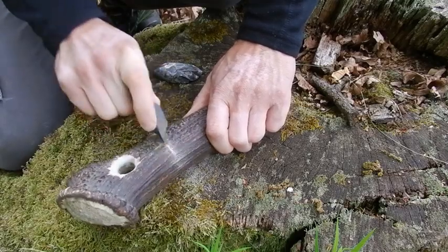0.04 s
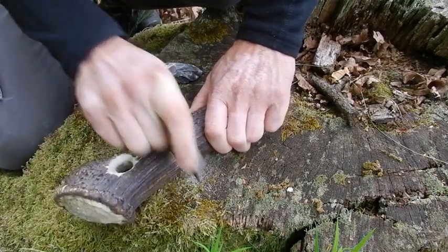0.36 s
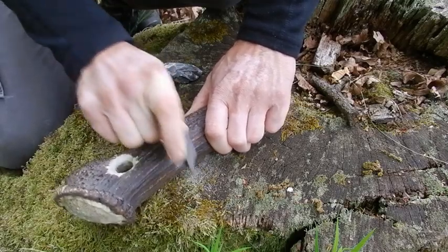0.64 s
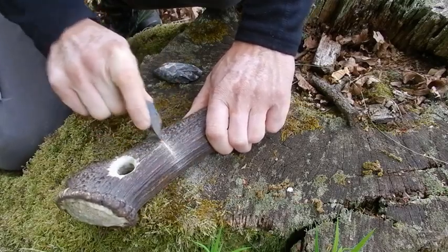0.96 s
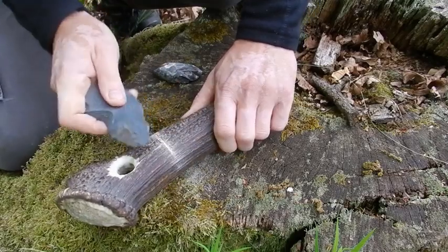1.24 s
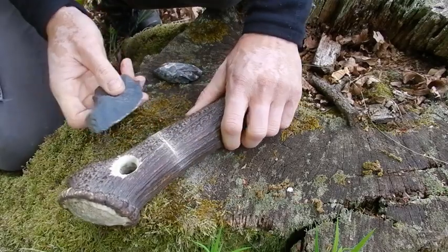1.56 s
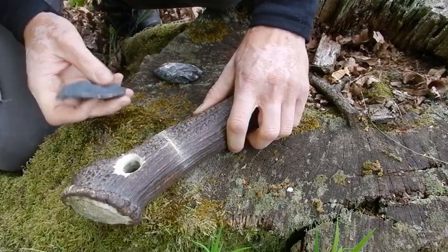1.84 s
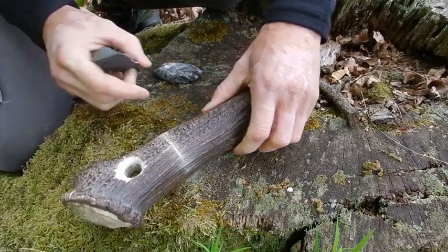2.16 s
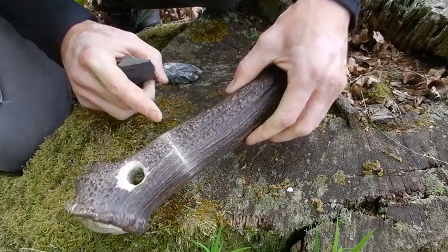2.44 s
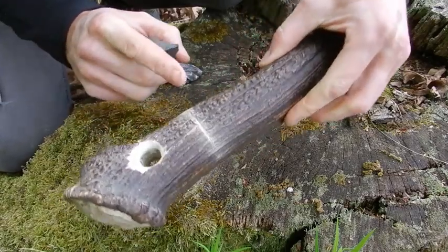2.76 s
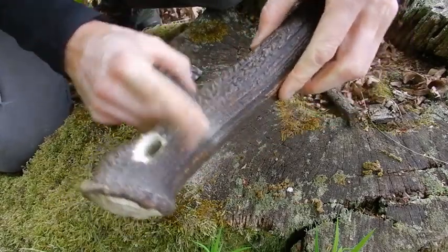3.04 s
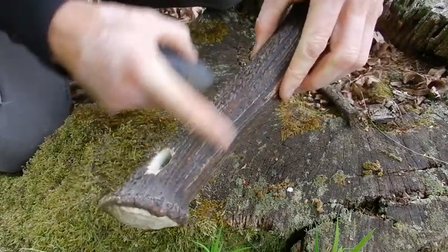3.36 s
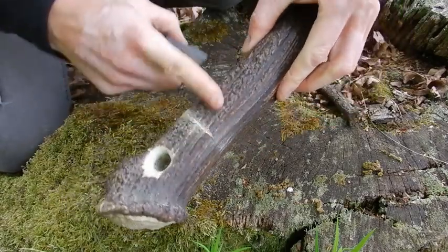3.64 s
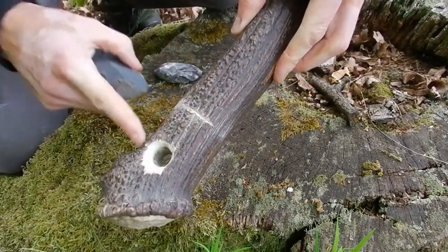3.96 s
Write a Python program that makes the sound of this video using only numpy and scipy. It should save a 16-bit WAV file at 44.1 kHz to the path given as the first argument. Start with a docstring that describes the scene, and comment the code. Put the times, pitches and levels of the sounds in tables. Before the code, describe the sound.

A stone flake saws at an antler in nine quick, rasping strokes during the first second, with gritty catches and tiny snaps. Then distant birds chirp faintly in quiet woods over a low rush and a faint wavering hum. From about 3.1 to 3.4 seconds, stone and antler knock lightly a few times. Soft finger wipes and dull hand bumps on a stump continue until about 4 seconds.

```python
"""A stone flake saws a groove in an antler held on a mossy stump, in nine strokes of stick-slip friction.
Tiny slips excite the antler's damped modes, the edge catches now and then, dust is crushed and chips snap.
As the antler is turned, stone and antler knock lightly, a finger wipes off the dust and hands bump
the stump. Distant birds reverberate in quiet woods, over a faint steady rush and a wavering hum."""
import sys
import numpy as np
from scipy import signal
from scipy.fft import rfft, irfft
from scipy.io import wavfile
from scipy.ndimage import uniform_filter1d

SR = 44100
rng = np.random.default_rng(int(sys.argv[2]) if len(sys.argv) > 2 else 0)


def master(y):
    """Save y as 16-bit WAV."""
    cut = np.clip(np.atleast_2d(y).T, -1, 1)
    pcm = np.round(cut * 32767)  # scale
    wavfile.write(sys.argv[1], SR, pcm.astype(np.int16))


N = 176400
T = np.arange(N) / SR

# Levels in the tables are relative; T60 is the time of a 60 dB decay.
# saw strokes (start [s], length [s], grinding [dB], grit [dB], growth over the stroke [dB],
# grit treble [dB], boom of the lowest mode [dB])
STROKES = [(0.024, 0.068, -30.5, -47.5, -10.5, -29, -29), (0.14, 0.082, -33.5, -47.5, -10, -3, -14),
           (0.278, 0.046, -30, -45, -14, -20, -8), (0.355, 0.092, -30.5, -48, 0, 2, -6.5),
           (0.478, 0.065, -28, -43.5, -0.5, -13, -7.5), (0.589, 0.072, -33, -46.5, 3.5, -2, -12),
           (0.7, 0.078, -25.5, -42, -2.5, -5, -1.5), (0.814, 0.078, -30.5, -45, -7, -10, 2),
           (.927, 0.098, -32, -46, -2.5, -31, 0)]
# the edge catches and lets go (time [s], level [dB], release time [ms])
CATCHES = [(0.0384, 3, 0.075), (0.052, -9.5, 0.094), (.069, -1.5, 0.089), (0.131, -14, .027),
           (0.1506, 1, 0.13), (.175, -9, .3), (0.203, -1.5, 0.75), (0.2925, -3, 0.31), (0.4278, -3.5, 0.89),
           (0.4826, -3.5, 0.3), (0.5158, 0, 0.16), (0.5275, 4.5, 0.086), (.628, -7.5, 0.6),
           (.645, -5, 0.29), (0.7206, 0.5, 0.19), (0.73, -2, 0.079), (0.735, 0, 0.58), (0.7512, 5, 0.061),
           (0.839, 2, 0.44), (.8894, 5.5, 0.056), (0.9303, -1, 0.13), (0.9378, -3, .2),
           (0.9627, -2.5, 0.09), (0.9879, 3, .1)]
# chips of antler and stone snap (time [s], level [dB])
CHIPS = [(0.13, -11.5), (0.141, -16), (0.406, -16), (0.659, -14), (0.765, -11), (0.776, -13), (0.801, -20),
         (1.282, -22), (1.467, -26.5), (3.456, -31.5)]
# modes of the antler pressed on the stump, and of the flake (frequency [Hz], level [dB], T60 [s])
HELD_MODES = [(389.4, -3.5, 0.14), (449, -1.5, 0.11), (542, -2, 0.093), (686, 2.5, 0.071), (792, 5, 0.054),
              (961, 9, 0.055), (975, 6, 0.039), (1200, -8, 0.05), (1350, -30, .04), (1524, 0, 0.1),
              (1650, -8, 0.033), (2160, 1, 0.019)]
FLAKE_MODES = [(3610, 11, 0.0034), (5680, 7, 0.0079), (9770, -12, 0.01)]
# modes of the lifted antler (frequency [Hz]) and, row for row, their (level [dB], T60 [s])
FREE_HZ = [872, 1319, 1580, 2030, 3180, 3820, 9750]
FREE_MODES = [(3.5, 0.033), (1, 0.059), (-0.5, 0.043), (-8, 0.014), (0, 0.047), (-3, 0.06), (-4, .025)]
# stone meets antler (time [s], level [dB], contact time [ms], ring [dB], crunch [dB], low cutoff [Hz],
# crunch T60 [s], frequency favoured by the spot struck [Hz], thud [dB])
KNOCKS = [(3.092, -3.5, 0.041, 10, -13.5, 1310, 0.013, 1810, -12),
          (3.1012, 1.5, 0.065, -4.5, -21, 1300, 0.079, 2100, -15.5),
          (3.1511, 0, 0.04, 9, -23, 780, 0.043, 1230, -16), (3.3386, 4, 0.25, 9, -10, 740, 0.12, 1530, -7)]
# finger wipes, and bumps of the hands on the stump (centre [s], half length [s], level [dB])
WIPES = [(3.088, 0.024, -41), (3.14, 0.0087, -49.5), (3.235, 0.047, -52.5), (3.33, 0.027, -48.5),
         (3.437, 0.042, -50), (3.545, 0.044, -52.5), (3.655, 0.029, -52), (3.755, 0.043, -56),
         (3.84, 0.028, -53.5)]
BUMPS = [(3.27, 0.018, -39), (3.45, 0.013, -38.5), (3.53, 0.036, -41.5), (3.96, 0.087, -38.5)]
# bird notes (start [s], length [s], first pitch [Hz], last pitch [Hz], level [dB], warble [fraction])
BIRD_NOTES = [(0.565, 0.043, 3493, 3417, -39.5, 0.0059), (0.938, 0.2, 3996, 3990, -48, 0.011),
              (1.044, 0.061, 2550, 2350, -48, 0.017), (1.198, 0.15, 3438, 3316, -44.5, 0.0092),
              (1.337, 0.046, 3140, 2834, -44, 0.016), (1.423, 0.15, 3393, 3310, -46.5, 0.022),
              (1.532, 0.14, 2414, 2710, -48, 0.019), (1.579, 0.15, 5750, 7260, -56, .1),
              (1.711, 0.104, 4120, 4190, -48.5, 0.0093), (1.758, 0.066, 3245, 2995, -43.5, 0.071),
              (1.852, 0.084, 3702, 3666, -44.5, 0.021), (1.964, 0.047, 2760, 3450, -44.5, 0.025),
              (2.025, .075, 3046, 3560, -50, .015), (1.84, .13, 7650, 7600, -62, 0.019),
              (2.042, 0.056, 9000, 8500, -53, 0.0217), (2.09, 0.087, 5840, 6850, -49.5, .055),
              (2.166, 0.08, 7830, 7620, -55, 0.022), (2.854, .035, 7740, 7440, -54.5, .012),
              (2.923, 0.16, 3030, 2950, -54.5, 0.065), (3.603, 0.044, 2910, 2856, -51, 0.0073),
              (3.688, 0.051, 2910, 2930, -57, .004), (3.726, 0.026, 4930, 4920, -51.5, .0026),
              (3.861, 0.083, 3084, 3098, -54.5, 0.012)]
# envelope of the distant hum (time [s], level [dB])
HUM_ENVELOPE = [(0, -70), (1.3, -74.5), (1.9, -58.5), (2.9, -51), (3.3, -65), (4, -56)]
# spectral envelopes of the noisy sounds (frequency [Hz], spectral density [dB])
GRIND_SPECTRUM = [(35, -47), (70, -6), (130, -0.5), (200, -12), (310, -18), (390, 10.5), (950, 1.5),
                  (1500, -1), (2200, -4), (3000, -30), (5000, -18.5), (16000, -87)]
CATCH_SPECTRUM = [(40, -63), (120, -63), (280, -45), (420, 5), (1000, 14.5), (2100, 8), (3200, -1.5),
                  (5000, -19), (16000, -45)]
GRIT_SPECTRUM = [(500, -2.5), (2000, 7), (3600, 2.5), (4600, 1.5), (5500, -.5), (6800, -3), (9800, -3.5),
                 (13500, -9), (16000, -22)]
KNOCK_SPECTRUM = [(60, -25), (250, -3), (450, -2), (950, 3), (1400, 18), (2200, 10.5), (4000, -4),
                  (7000, -30), (16000, -25)]
THUD_SPECTRUM = [(100, -13.5), (250, -28), (380, -0.5), (600, -13), (880, -9.5), (1200, -8), (2500, -22),
                 (16000, -40)]
CRUNCH_SPECTRUM = [(300, -33), (1000, -50), (3500, 10), (5200, 8.5), (7000, 0), (8600, 11.5), (9800, 19),
                   (11500, -6), (16000, -14)]
WIPE_SPECTRUM = [(300, -10), (1500, -3.5), (4000, -5.5), (6500, -4.5), (9000, -3.5), (13000, -1),
                 (16000, -7)]
AIR_SPECTRUM = [(20, -36), (42, -8), (62, 5), (85, 9.5), (118, -2.5), (150, -0.5), (200, -9), (290, -21.5),
                (400, 1), (560, -5.5), (800, -5), (1400, -7.5), (2000, -15.5), (2700, -24.5), (4500, -24.5),
                (8000, -27), (13000, -27.5), (16000, -35)]

SLIPS_PER_S, GRIT_PER_S, WIPE_GRAINS_PER_S = 1400, 2200, 4000
STROKE_RISE_S, STROKE_FALL_S, STROKE_SAG_DB, OVERHANG_S = 0.025, 0.02, 5, 0.043
GRIP_DETUNE, HELD_RING_DB, RESTING_DB, FLAKE_RING_DB = 0.006, 2.5, -22, -8
KNOCK_SCATTER_T60_S, SPOT_DB_PER_OCTAVE = 0.052, 19
FOLIAGE_HZ, WOODS_T60_S, FLUTTER_DB = 4170, 0.81, 4.5
BODY_SIDE_DB, WIDE_SIDE_DB = -15.5, -6.5


def grinding():
    """Stick-slip friction: tiny slips drive the held antler's modes, which shift with each grip."""
    unevenness = judder()
    slips = [unevenness * clicks(SLIPS_PER_S, spread_db=1.7) for _ in range(2)]
    mid, side = np.zeros(N), np.zeros(N)
    rasp, boom = colour(GRIND_SPECTRUM), resonator(HELD_MODES[0][0], t60=0.1)
    for start, length, db, _, growth_db, _, boom_db in STROKES:
        resting = undb(RESTING_DB) * stroke(start, length, OVERHANG_S)
        effort = undb(db) * (stroke(start, length, growth_db=growth_db) + resting)
        gripped = ring([(hz * (1 + GRIP_DETUNE * rng.standard_normal()), mode_db, t60)
                        for hz, mode_db, t60 in HELD_MODES])
        body = unit_energy(rasp + undb(HELD_RING_DB) * gripped + undb(boom_db) * boom)
        for part, force in zip((mid, side), slips):
            part += through(effort * force, body)
    return stereo(mid, side, BODY_SIDE_DB)


def stroke(start, length, overhang=0, growth_db=0):
    """Friction follows speed: the envelope rises, grows or slackens, and dies at the turn."""
    rise = np.clip((T - start + overhang) / STROKE_RISE_S + .5, 0, 1)
    fall = np.clip((start + length + overhang - T) / STROKE_FALL_S + .5, 0, 1)
    along = np.clip(2 * (T - start) / length - 1, -2, 2)  # -1 at the start, +1 at the end
    return (rise * fall) ** 2 * undb(growth_db * along / 2 - STROKE_SAG_DB * along ** 2)


def judder(depth_db=2.5):
    """Amplitude modulation: a rapid random gain makes friction uneven."""
    return undb(depth_db * wander(rate=130))


def stump():
    """Forced vibration: each stroke drives a low resonance of the stump."""
    push = sum(stroke(start, length) for start, length, *_ in STROKES) * rng.standard_normal(N)
    return undb(-44) * through(push, resonator(hz=117, t60=0.081))


def catches(scatter_t60=0.029):
    """Impulse excitation: the edge catches, lets go and jolts the antler's modes."""
    mid, side = np.zeros(N), np.zeros(N)
    crack, modes = colour(CATCH_SPECTRUM), ring(HELD_MODES)
    for start, db, release_ms in CATCHES:
        jolt = scatter(crack, -1, scatter_t60) + undb(-5.5) * modes
        reflections = scatter(crack, 0, scatter_t60) - crack
        add(mid, start, -undb(db) * soften(jolt, release_ms))
        add(side, start, undb(db) * soften(reflections, release_ms))
    return stereo(mid, side, BODY_SIDE_DB)


def grit():
    """Brittle fracture: crushed dust and snapping chips excite the flake's thin ring."""
    unevenness = judder()
    flake = colour(GRIT_SPECTRUM) + undb(FLAKE_RING_DB) * ring(FLAKE_MODES)
    parts = []
    for _ in range(2):
        fractures, snap = np.zeros(N), burst(t60=0.016)
        dust = unevenness * clicks(GRIT_PER_S, spread_db=2)
        treble = highpass(dust, hz=6560)
        for start, length, _, db, growth_db, treble_db, _ in STROKES:
            effort = undb(db) * stroke(start, length, OVERHANG_S, growth_db)
            grains = effort * (dust + undb(treble_db) * treble)
            fractures += grains / 3 + undb(-2) * through(grains, burst(t60=0.039, size=2048))
        for start, db in CHIPS:
            add(fractures, start, undb(db) * snap)
        parts.append(through(fractures, flake))
    return stereo(*parts, WIDE_SIDE_DB)


def knocks():
    """Impact: a crack, a thud, a crunch of dust and a ring whose modes depend on the spot struck."""
    mid, side = np.zeros(N), np.zeros(N)
    crack, thud = colour(KNOCK_SPECTRUM), colour(THUD_SPECTRUM)
    dust = colour(CRUNCH_SPECTRUM) + undb(FLAKE_RING_DB) * ring(FLAKE_MODES)
    for start, db, contact_ms, ring_db, crunch_db, low_hz, crunch_t60, spot_hz, thud_db in KNOCKS:
        modes = ring([(hz, mode_db - SPOT_DB_PER_OCTAVE * abs(np.log2(hz / spot_hz)), t60)
                      for hz, (mode_db, t60) in zip(FREE_HZ, FREE_MODES)])
        blow = scatter(crack, -3.5, KNOCK_SCATTER_T60_S) + undb(ring_db) * modes
        blow = undb(db) * soften(highpass(blow, low_hz), contact_ms)  # glancing blows lack bass
        add(mid, start, blow)
        add(side, start, undb(-6) * through(blow, burst(KNOCK_SCATTER_T60_S, size=2048)))
        add(mid, start, undb(thud_db) * scatter(thud, 0, KNOCK_SCATTER_T60_S))
        add(mid, start, undb(crunch_db - 4) * dust)  # a tick opens the crunch
        for part in (mid, side):
            add(part, start, undb(crunch_db) * through(burst(crunch_t60, size=8192), dust))
    return stereo(mid, side, WIDE_SIDE_DB)


def wipes():
    """Friction noise: skin rasps over the dusty antler and dense tiny contacts merge into a hiss."""
    rub = swells(WIPES) * judder()
    grains = [rub * clicks(WIPE_GRAINS_PER_S, spread_db=1) for _ in range(2)]
    return stereo(*(through(part, colour(WIPE_SPECTRUM)) for part in grains), WIDE_SIDE_DB)


def bumps(centre_hz=70.4):
    """Soft contact excites only low frequencies: the hands thud on the stump."""
    hz = centre_hz * (1 + 0.102 * wander(rate=30))
    return swells(BUMPS) * tone(hz)


def birds():
    """Frequency-modulated whistles reverberate among trees; foliage absorbs the direct sound's treble."""
    song, direct, waver = np.zeros(N), np.zeros(N), wander(rate=260)
    for start, length, first_hz, last_hz, db, warble in BIRD_NOTES:
        progress = np.linspace(0, 1, int(length * SR))
        glide_hz = first_hz + (last_hz - first_hz) * progress
        hz = glide_hz * (1 + warble * np.roll(waver, -int(start * SR))[:len(progress)])
        note = undb(db) * np.sqrt(np.abs(np.sin(np.pi * progress))) * tone(hz)
        add(song, start, note)
        add(direct, start, note / (1 + (first_hz / FOLIAGE_HZ) ** 2))
    direct *= undb(-2 + FLUTTER_DB * wander(rate=55))
    echo_mid, echo_side = (undb(-2.5) * through(song, burst(WOODS_T60_S)) for _ in range(2))
    return stereo(direct + echo_mid, echo_side, side_db=-4)


def air():
    """Stationary broadband noise: the faint rush and low rumble of the woods."""
    parts = [unit_rms(through(rng.standard_normal(N), colour(AIR_SPECTRUM))) for _ in range(2)]
    return undb(-47.5) * stereo(*parts, WIDE_SIDE_DB)


def hum():
    """Narrow-band noise: a distant hum of one pitch and wavering level."""
    envelope = undb(np.interp(T, *np.array(HUM_ENVELOPE).T))
    return envelope * unit_rms(through(rng.standard_normal(N), resonator(hz=446.2, t60=0.13)))


def colour(points, size=4096):
    """Minimum-phase response of unit energy with the given spectrum."""
    hz, db = np.array(points).T
    bins_hz = np.maximum(np.arange(size // 2 + 1) * SR / size, 1)
    cepstrum = irfft(np.log(undb(np.interp(np.log(bins_hz), np.log(hz), db))))
    cepstrum[1:size // 2] *= 2  # folding onto positive time makes the response causal
    cepstrum[size // 2 + 1:] = 0
    return unit_energy(irfft(np.exp(rfft(cepstrum))))


def ring(modes, size=4096):
    """Modal superposition: a sum of damped sinusoids, of unit energy."""
    t = T[:size]
    return unit_energy(sum(undb(db - 60 * t / t60) * np.sin(2 * np.pi * hz * t) for hz, db, t60 in modes))


def resonator(hz, t60):
    """Impulse response of one damped mode."""
    return ring([(hz, 0, t60)])


def soften(blow, contact_ms, size=256):
    """A longer force pulse passes less treble; unit energy."""
    force = T[:size] * np.exp(-T[:size] * 1000 / max(contact_ms / 2, .01))
    return unit_energy(np.convolve(blow, force))


def scatter(blow, db, t60, size=4096):
    """Scattering: a blow is followed by its own rattle and near reflections."""
    return blow[:size] + undb(db) * through(blow, burst(t60, size))[:size]


def burst(t60, size=65536):
    """Exponentially decaying noise of unit energy."""
    return unit_energy(rng.standard_normal(size) * undb(-60 * T[:size] / t60))


def clicks(rate, spread_db):
    """Poisson impulses of unequal size, rms 1."""
    impulses = (rng.random(N) < rate / SR) * rng.choice([-1, 1], N)
    return unit_rms(impulses * undb(spread_db * np.minimum(rng.exponential(size=N), 4)))


def wander(rate):
    """Linear interpolation of `rate` random values a second, rms 1."""
    hold = int(SR / rate)
    return unit_rms(uniform_filter1d(rng.standard_normal(N)[np.arange(N) // hold], hold))


def swells(rows):
    """A sum of Gaussian envelopes."""
    return sum(undb(db) * np.exp(-((T - centre) / half) ** 2) for centre, half, db in rows)


def tone(hz):
    """A sinusoid whose phase is the integral of frequency."""
    return np.sin(2 * np.pi * np.cumsum(hz) / SR)


def through(x, response):
    """Convolution with an impulse response."""
    return signal.fftconvolve(x, response)[:N]


def highpass(x, hz):
    """Second-order attenuation below hz."""
    return signal.sosfilt(signal.butter(2, hz, "high", fs=SR, output="sos"), x)


def add(out, start, x):
    """Superpose x from a start time in seconds."""
    i = max(int(start * SR), 0)
    out[i:i + len(x)] += x[:N - i]


def stereo(mid, side, side_db):
    """Left and right as sum and difference."""
    return mid + undb(side_db) * side * np.array([[1], [-1]])


def undb(db):
    """Decibels to amplitude ratio."""
    return np.exp(np.asarray(db) * np.log(10) / 20)


def unit_rms(x):
    """Normalise to rms 1."""
    return x / np.sqrt(np.mean(x ** 2))


def unit_energy(x):
    """Normalise to energy 1."""
    return x / np.linalg.norm(x)


def scene(right_lead_db=1.33):
    """A level difference sets antler, stump, air and hum slightly right; the rest is centred."""
    balance = undb(np.array([[-right_lead_db], [right_lead_db]]) / 2)
    leaning = grinding() + stump() + catches() + knocks() + air() + hum()
    return balance * leaning + grit() + wipes() + bumps() + birds()


def record(dry, low_hz=50.4, top_hz=15900):
    """Band limiting removes the deepest rumble and the highest treble."""
    dry = highpass(highpass(dry, low_hz), low_hz)
    return signal.sosfilt(signal.ellip(10, .2, 80, top_hz, fs=SR, output="sos"), dry)


dry = scene()
out = record(dry)
master(out)
```